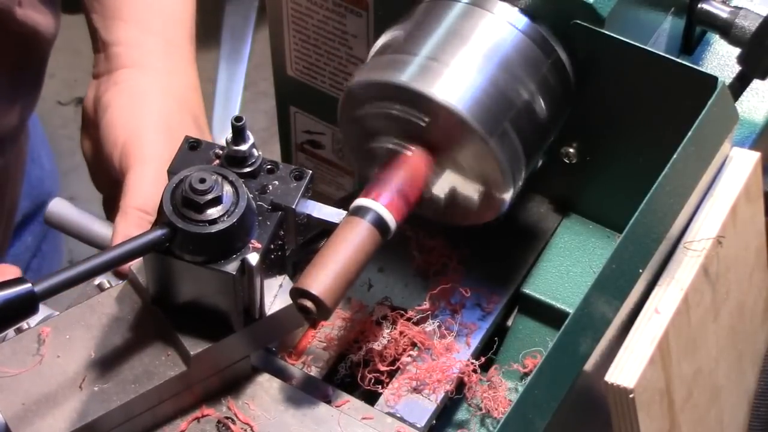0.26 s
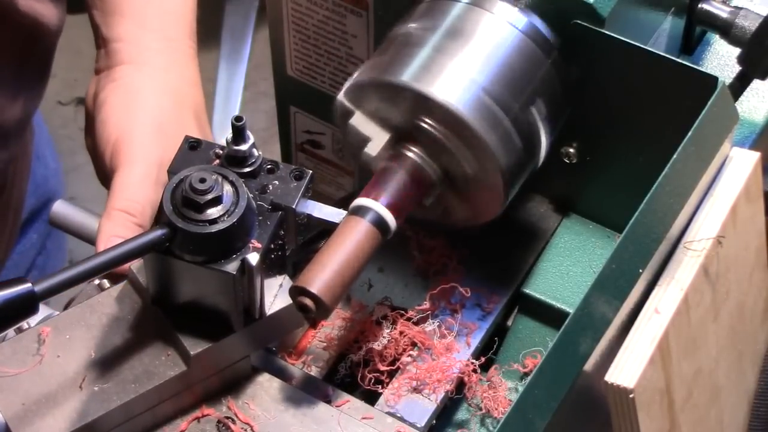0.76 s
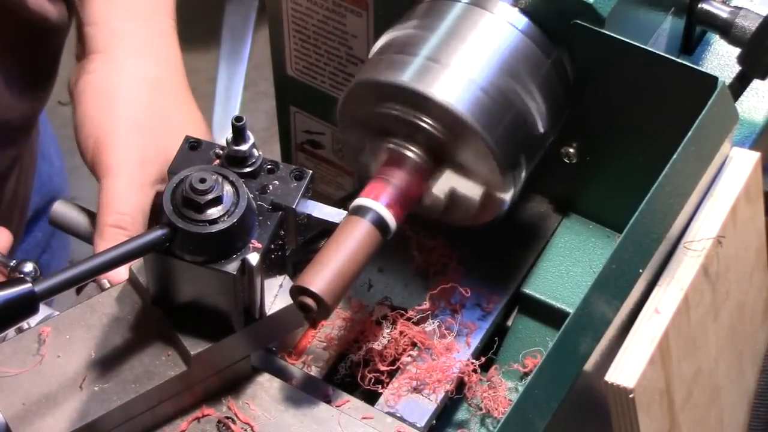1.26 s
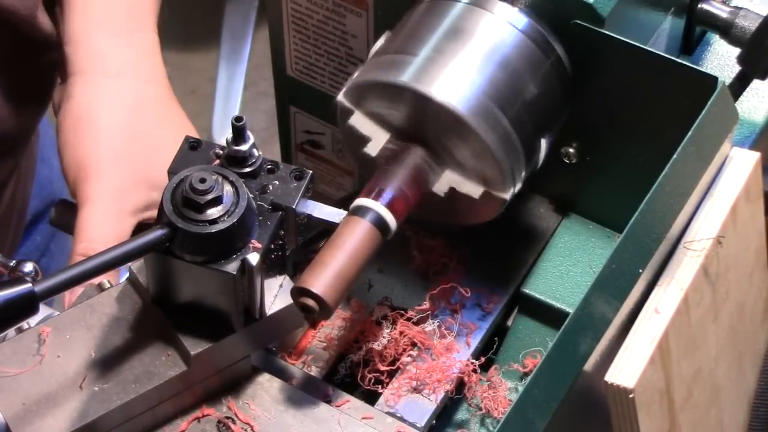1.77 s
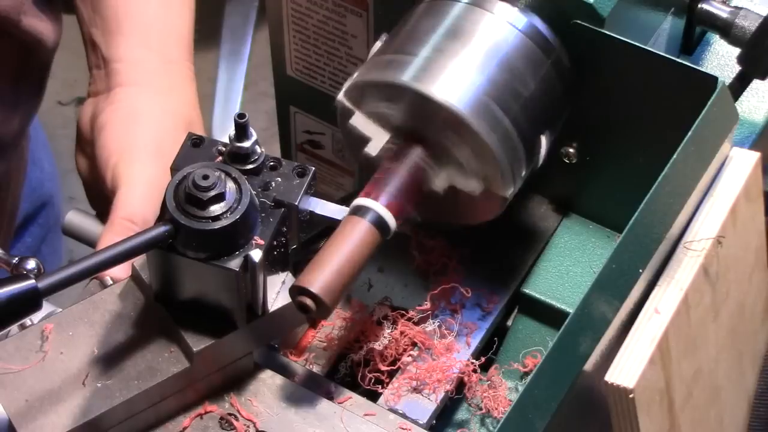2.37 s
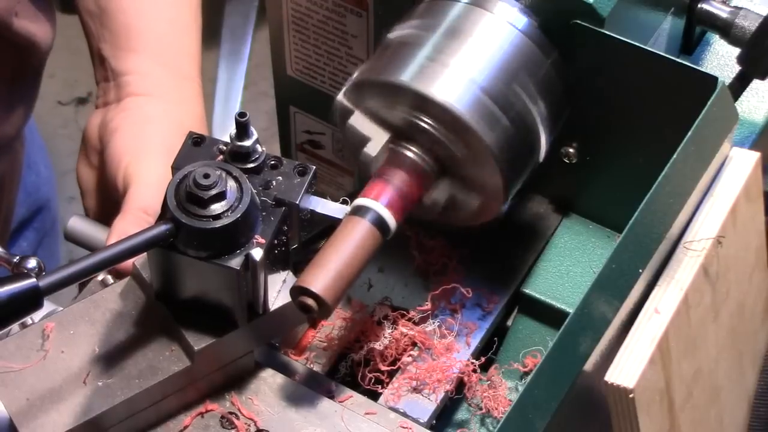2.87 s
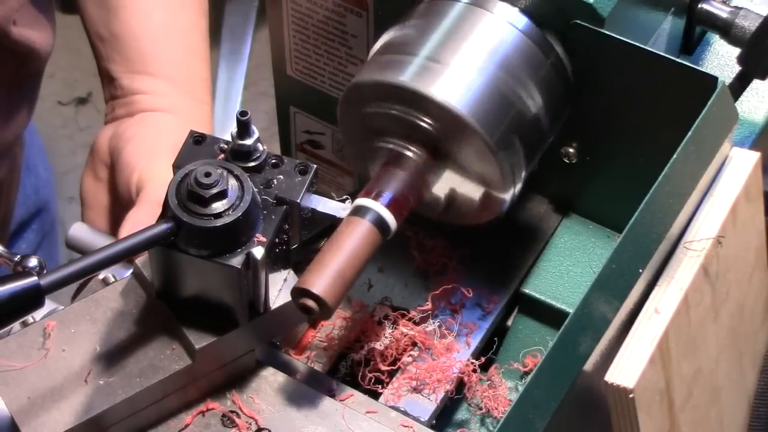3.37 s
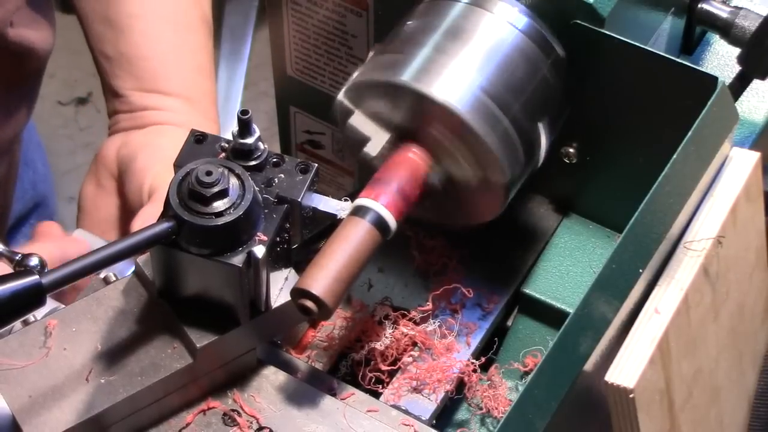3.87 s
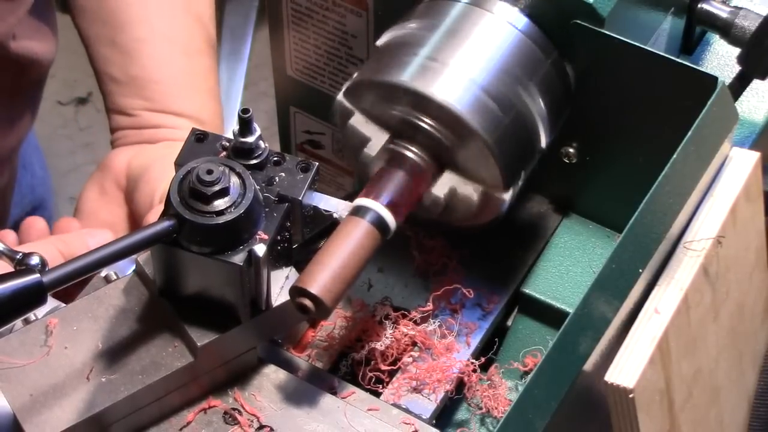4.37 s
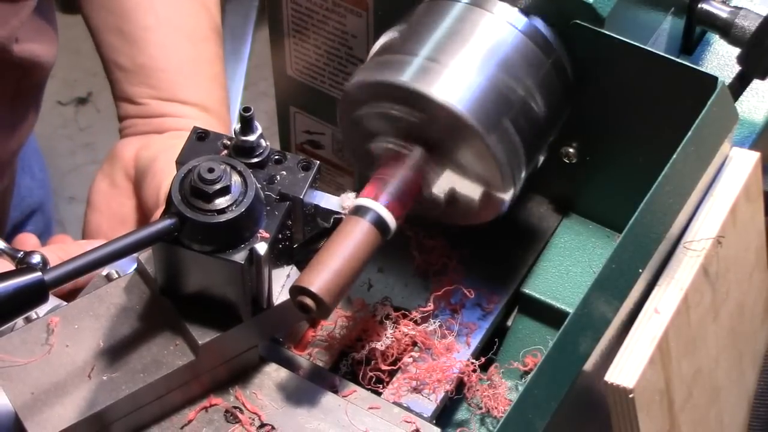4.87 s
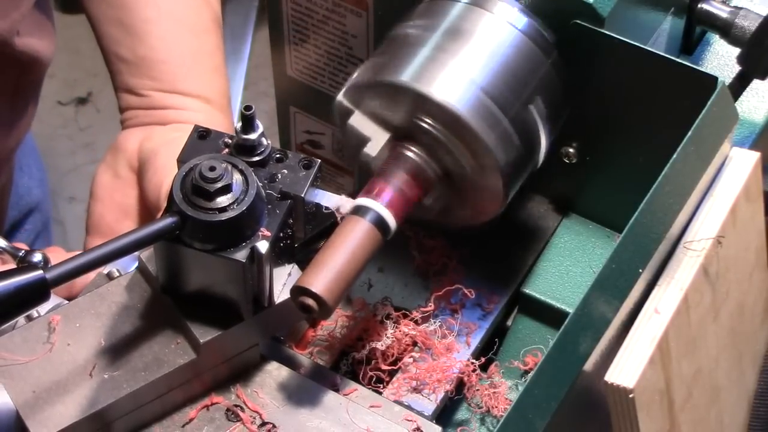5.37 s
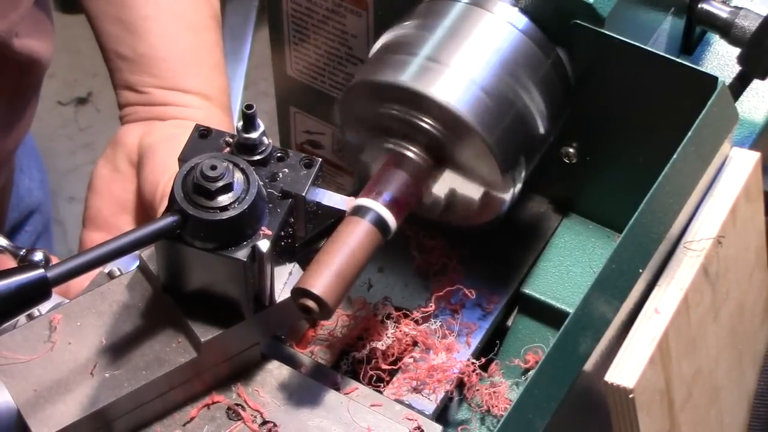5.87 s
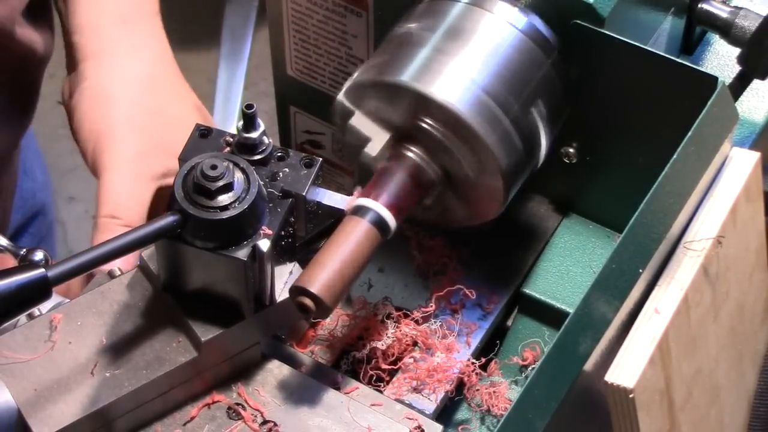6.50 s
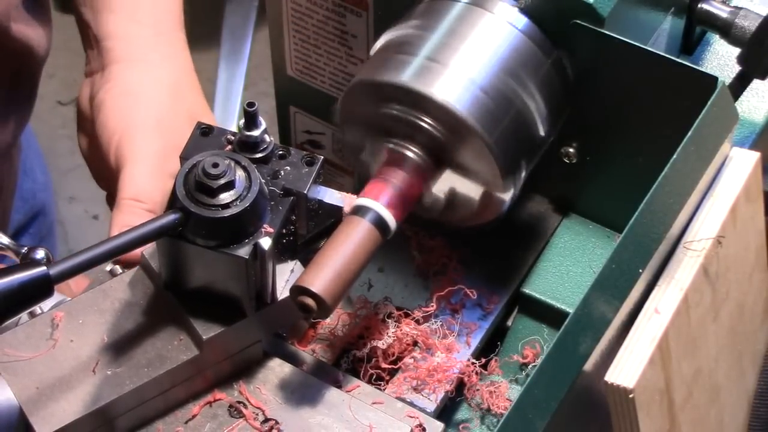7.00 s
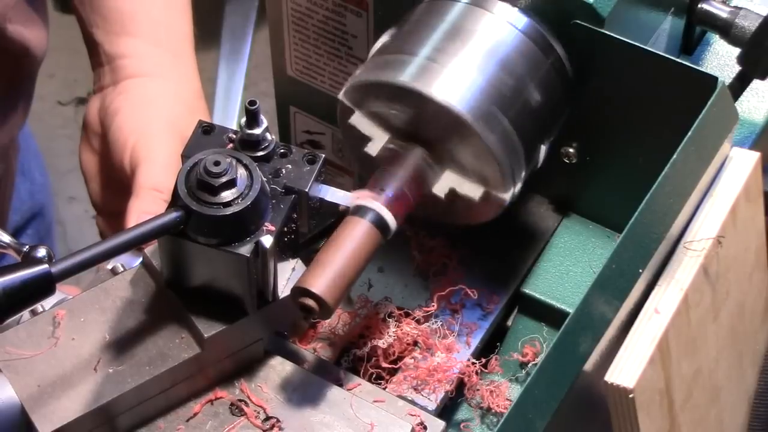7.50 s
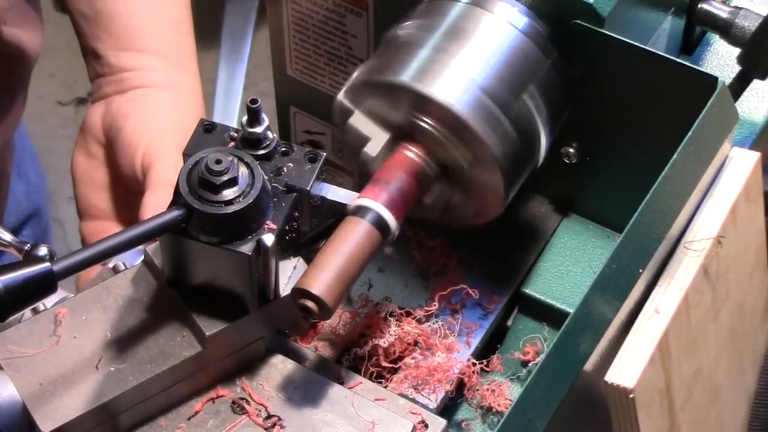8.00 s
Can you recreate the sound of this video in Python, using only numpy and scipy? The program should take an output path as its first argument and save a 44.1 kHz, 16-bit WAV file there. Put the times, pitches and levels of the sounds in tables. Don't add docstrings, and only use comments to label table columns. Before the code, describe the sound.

Close motor hum and gear rattle run alone for two seconds before rapid, regular screechy scrapes begin, pause briefly, then return doubled.

```python
import sys
import numpy as np
from scipy import signal
from scipy.io import wavfile
from scipy.ndimage import uniform_filter1d

SR = 44100
rng = np.random.default_rng(int(sys.argv[2]) if len(sys.argv) > 2 else 0)


def unload_wav(signal):
    wavfile.write(
        sys.argv[1],
        SR,
        np.round(np.clip(np.atleast_2d(signal).T, -1, 1) * 32767).astype(np.int16),
    )


def convert_level_to_amplitude(level_db):
    exponent = np.asarray(level_db, float) / 20
    return 10 ** exponent


N = 363825
SHAFT_HZ = 24.58


def evened(x):
    return x / np.sqrt(np.mean(x ** 2) + 1e-20)


def colour(x, points):
    f, db = np.transpose(points)
    log_hz = np.log(abs(np.fft.fftfreq(8192, 1 / SR)) + 1)
    log_gain = np.interp(log_hz, np.log(f), np.maximum(db, -100)) * np.log(10) / 20
    response = np.exp(np.conj(signal.hilbert(log_gain)))
    taps = np.fft.ifft(response).real[:4096]
    return signal.oaconvolve(x, taps)[:N]


def resonate(x, hz, width):
    r = np.exp(-np.pi * width / SR)
    return 2 * signal.lfilter([1 - r], [1, -r * np.exp(2j * np.pi * hz / SR)], x).real


def drift(seconds):
    size = max(int(seconds * SR), 1)
    return evened(uniform_filter1d(uniform_filter1d(rng.standard_normal(N), size), size))


def cutting():
    # hz, level_db, t60_s
    tool_modes = [(2820, -7, 0.044), (3080, -7, 0.011), (3534, 0.5, 0.018), (3801, 4.5, 0.028),
                  (3750, -18, 0.34), (4230, -3.5, 0.032), (4676, -14, 0.031), (6360, -19.5, 0.0069),
                  (9170, -18.5, 0.014), (11790, -14.5, 0.011)]
    # hz, gain_db
    radiated = [(1500, -50), (2500, -0.5), (4000, -13), (6000, -14.5), (9000, -22), (10300, -26),
                (12000, -10), (14500, -25), (16000, -30)]
    layers = np.zeros((3, N + SR))
    for row, knots, snap_db in plan():
        at, *parts = bite(row, knots, snap_db)
        layers[:, at:at + len(parts[0])] = parts
    snaps, contact, rate_hz = layers[:, :N]
    drive = signal.lfilter([1, -1], [1, -0.7], snaps)
    modes = 0
    for k, (hz, db, t60) in enumerate(tool_modes):
        modes = modes + (-1) ** k * convert_level_to_amplitude(db + 14.5) * resonate(drive, hz, 2.97 / t60)
    return colour(drive, radiated) + modes + scratch(contact, rate_hz + 1)


def plan():
    # start_s, length_s, scratch_db, first_hz, last_hz
    grazes = [
        (2.065, 0.052, -47, 11500, 10500),
        (2.106, 0.06, -35.5, 2580, 4600),
        (4.042, 0.08, -40, 8900, 8150),
    ]
    # scratch_db, snap_db, depth_share
    roughing = [(-26, -4.5, 1.3), (-31, -2.5, 1.07), (-33, -6, .97), (-32.5, -6, .96), (-30.5, -4.5, .99),
                (-29, -1.5, 1.06), (-33, -4, .99), (-33, -4.5, .98), (-32.5, -4.5, .96), (-33, -8, .9)]
    # scratch_db, snap_db, first_hump_hz, second_hump_hz
    finishing = [(-32.5, -7, 6000, 4060), (-30.5, 2.5, 5400, 4550), (-26.5, -2, 4900, 4070),
                 (-30.5, -1.5, 5900, 6100), (-30, -0.5, 7120, 4960), (-30, -3, 6700, 6700),
                 (-28.5, -2.5, 6100, 4560), (-27, -3, 5150, 3800), (-32.5, -10, 7670, 6200),
                 (-30, -5.5, 7000, 4180), (-27.5, -4.5, 6300, 5000), (-39.5, -2, 6600, 7700),
                 (-42.5, -3, 7600, 7700), (-56, -2, 8940, 7800), (-24.5, -3, 5336, 3940),
                 (-29, -5, 5550, 6060), (-27.5, -8, 6500, 4400), (-27, -4.5, 5500, 4200),
                 (-24.5, -4, 5510, 3760), (-30.5, -0.5, 6860, 4700), (-27, -2.5, 6360, 4370),
                 (-25, -7, 5000, 3820), (-30, -2, 5700, 4380)]
    # segment_rate_hz at depth 1, power by which depth lowers it
    rough_rates = [(4684, 1.3), (2923, 0.284), (3800, 0.89)]
    rough_knots = [0.2, 0.42, .72]
    finish_knots = [.024, .048, .072, .1]
    turn_s = 0.17968
    edge_hz = 13000
    bites = [((s, length, db, first, last), [length], -4) for s, length, db, first, last in grazes]
    for turn, (db, snap_db, depth) in enumerate(roughing):
        length = 0.084 * depth ** 0.45
        start = 2.294 + turn * turn_s - length / 2
        rates = [hz / depth ** power for hz, power in rough_rates]
        knots = [share * length for share in rough_knots] + [length]
        bites.append(((start, length, db, edge_hz, *rates, edge_hz), knots, snap_db))
    for turn, (db, snap_db, first, second) in enumerate(finishing):
        start = 4.1455 + turn * turn_s
        hollow_hz = 1.26 * max(first, second)
        rates = [edge_hz, first, hollow_hz, second, edge_hz]
        bites.append(((start, 0.109, db, *rates), finish_knots, snap_db))
    return bites


def bite(row, knots, snap_db, uneven=0.053, sizes=0.045):
    mode_hz, lock_span, lock_peak_db = 3765, 0.17, 3
    start, length, db, *rates_hz = row
    t = np.arange(int(length * SR)) / SR

    period = np.interp(t, [0, *knots], 1 / np.array(rates_hz))
    period = uniform_filter1d(period, 130)
    luck = rng.standard_normal(size=(3, 2500))
    sway = evened(uniform_filter1d(rng.standard_normal(size=12000), 90))
    period = period * (1 + 0.034 * sway[:len(t)])
    off = mode_hz * period - 1
    period = period - 0.58 * off * np.exp(-(off / 0.084) ** 4) / mode_hz

    count = np.cumsum(1 / period) / SR
    whole = np.arange(1, int(count[-1]))
    slip = uneven * convert_level_to_amplitude(0.48 * (db + 30.5)) * luck[0] + 0.0496 * np.cumsum(luck[1])
    at = np.interp(whole + slip[whole], count, np.arange(len(t)))

    ratio = mode_hz * period[at.astype(int)]
    lock_db = lock_peak_db * np.exp(-((ratio - 1) / lock_span) ** 4)
    size = (1 + sizes * luck[2][whole]) * ratio ** 1.76 * convert_level_to_amplitude(lock_db)

    near = at.astype(int)[:, None] + np.arange(-7, 9)
    away = near - at[:, None]
    snaps = np.zeros(len(t) + 32)
    np.add.at(snaps, near + 8, size[:, None] * np.sinc(away) * np.cos(np.pi * away / 18) ** 2)

    touch = np.clip(np.minimum(t / 0.006, (t[-1] - t) / 0.01), 0, 1)
    snaps = convert_level_to_amplitude(db + snap_db + 24.5) * touch * snaps[8:len(t) + 8]
    return round(start * SR), snaps, convert_level_to_amplitude(db + 2.5) * touch, 1 / period


def scratch(contact, rate_hz, below_db=-15, patchy_db=4.5, tilt_db=-3.0):
    # hz, density_db (per Hz)
    tear_colour = [(1470, -47), (2500, -41), (3320, -29), (3840, 6.5), (4440, -6), (4860, -8.5),
                   (6460, -10), (7350, -18), (8370, -10), (9830, -18), (11700, -7.5), (13100, -19),
                   (15300, -31.5)]
    hz, t, z = signal.stft(rng.standard_normal(N) * contact, SR, nperseg=128, noverlap=96)
    rate_now = np.interp(t, np.arange(N) / SR, rate_hz)
    octaves = np.log2((hz[:, None] + 1) / rate_now)
    gate_db = below_db / (1 + 2 ** (10 * (octaves + 0.13))) + tilt_db * np.clip(octaves, 0, 3)
    streak_db = 11 * np.exp(-(octaves / 0.08) ** 2)
    streak_db += 11 * np.exp(-((octaves - 1) / 0.06) ** 2)
    streak_db += 6 * np.exp(-((octaves - np.log2(3)) / 0.04) ** 2)
    grain = rng.standard_normal(z.T.shape).T
    patches = evened(uniform_filter1d(uniform_filter1d(grain, 3, 0), 9, 1))
    z = z * convert_level_to_amplitude(gate_db + streak_db + patchy_db * patches)
    torn = signal.istft(z, SR, nperseg=128, noverlap=96)[1][:N]
    unit_gain = np.linalg.norm(colour(signal.unit_impulse(4096), tear_colour))
    return colour(torn, tear_colour) / unit_gain


def workshop(x, low_t60=0.31, high_t60=0.17, split_hz=5500):
    t = np.arange(SR // 2) / SR
    taps = rng.choice([-1., 1.], len(t)) * (rng.random(len(t)) < 0.05) * (t > 0.004)
    low = signal.lfilter(*signal.butter(2, split_hz, fs=SR), taps)
    tail = low * convert_level_to_amplitude(-60 * t / low_t60) + (taps - low) * convert_level_to_amplitude(-60 * t / high_t60)
    return signal.oaconvolve(x, tail / np.linalg.norm(tail))[:N]


def gears():
    # hz, width_hz, level_db
    casing = [(167.6, 5.4, -27.5), (363, 21, -24.5), (471, 30, -23.5), (558.3, 34, -14),
              (597.6, 14.4, -2.5), (648.6, 24.6, -6), (686, 45, -15.5), (842, 53, -12), (890.2, 9.9, -7),
              (939.7, 35, -6), (988, 29, -13.5), (1074, 32, -21.5), (1379, 15.4, -19.5), (1588, 73, -23.5),
              (1694, 37, -24), (1794, 30, -28.5), (2223, 24, -24.5), (2586, 18, -24)]
    # hz, density_db (per Hz)
    rattle_colour = [(60, -60), (120, -26), (200, -24.5), (270, -10.5), (420, -9), (620, 2), (760, -8),
                     (950, 3), (1250, -12.5), (1900, -16.5), (3000, -17.5), (4000, -21.5), (5000, -27),
                     (7000, -45)]
    # time_s, level_db
    load_curve = [
        (0, -1.5),
        (1.9, -1.5),
        (2.3, .6),
        (8.25, .6),
    ]
    spindle_hz = 5.565
    t = np.arange(N) / SR
    strength = convert_level_to_amplitude(3.2 * np.minimum(rng.exponential(1, N), 3))
    knocks = strength * (rng.random(N) < 1500 / SR) * rng.choice([-1, 1], N)
    beat_db = 1.65 * np.sin(2 * np.pi * spindle_hz * t + 2.85)
    beat_db += 1.5 * np.sin(2 * np.pi * 27.3 * t) + 1.96 * drift(0.0067)
    sharp = (0.53 * evened(knocks) + 0.8 * rng.standard_normal(N)) * convert_level_to_amplitude(beat_db)
    soft = 0.5 * sharp + 0.73 * rng.standard_normal(N)
    rings = 0
    for k, (hz, width, db) in enumerate(casing):
        ring = resonate(resonate(soft, hz, 1.67 * width), hz, 1.67 * width)
        rings = rings + (-1) ** k * convert_level_to_amplitude(db) * ring
    load = convert_level_to_amplitude(np.interp(t, *np.transpose(load_curve)))
    return load * convert_level_to_amplitude(-27.5) * evened(colour(sharp, rattle_colour)) + convert_level_to_amplitude(-24.5) * evened(rings)


def hum():
    # hz, level_db (rms)
    mains = [(120, -83), (240, -39.5), (360, -39.5), (600, -25.5), (720, -58), (960, -35), (1080, -57),
             (1320, -57)]
    # order (multiple of the shaft rate), level_db (rms)
    orders = [(12, -37.5), (18, -43.5), (24, -44.5)]
    t = np.arange(N) / SR
    turns = SHAFT_HZ * np.cumsum(1 + 0.00084 * drift(0.27)) / SR
    lines = [(hz * t, db) for hz, db in mains] + [(order * turns, db) for order, db in orders]
    total = 0
    for cycles, db in lines:
        level = np.sqrt(2) * convert_level_to_amplitude(db + 0.48 * drift(0.049))
        total = total + level * np.sin(2 * np.pi * (cycles + rng.random()))
    return total


def brushes():
    # hz, gain_db
    hiss_colour = [(2650, -11), (4500, -19), (4920, -24.5), (5830, -21), (6240, 11.5), (6750, 15),
                   (8220, 9), (9070, 14), (9500, 9), (10300, 5), (12700, 0), (14700, -61), (15600, -35)]
    angle = 2 * np.pi * SHAFT_HZ * np.arange(N) / SR
    pulse_db = 1.7 * np.sin(angle + 0.82) + 1.7 * np.sin(2 * angle + 1.2) + 0.8 * drift(0.0029)
    return convert_level_to_amplitude(-51) * evened(colour(rng.standard_normal(N) * convert_level_to_amplitude(pulse_db), hiss_colour))


def scene():
    cut = cutting()
    echo = convert_level_to_amplitude(-11.5) * workshop(cut)
    return (cut + echo + gears() + hum() + brushes())[None]


def roll_off(x):
    return signal.sosfilt(signal.butter(12, 15710, fs=SR, output="sos"), x)


def record(dry):
    thin = signal.sosfilt(signal.butter(2, 100, "high", fs=SR, output="sos"), dry)
    limited = thin / (1 + (thin / 0.95) ** 6) ** (1 / 6)
    bent = limited + 0.005 * thin ** 4
    band_limit = signal.firwin(511, 15600, window=("kaiser", 8), fs=SR)
    mix = signal.oaconvolve(bent, band_limit[None], "same")
    return roll_off(mix)


dry = scene()
out = record(dry)
unload_wav(out)
```